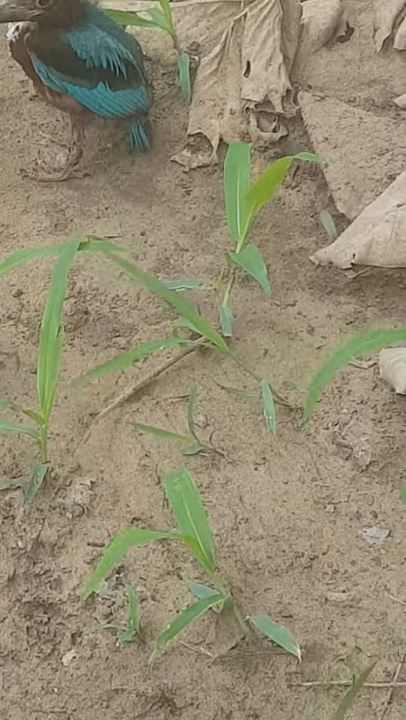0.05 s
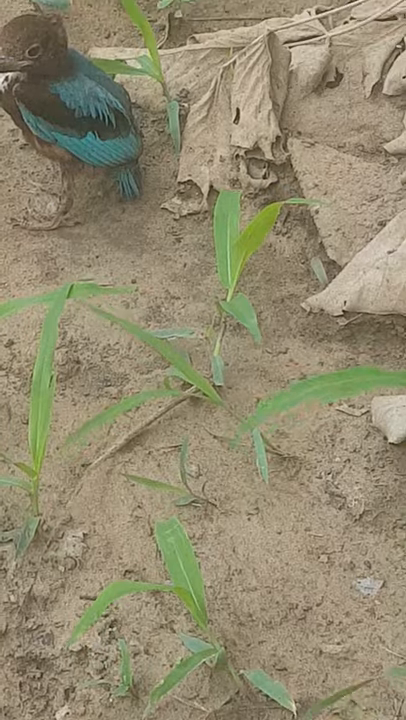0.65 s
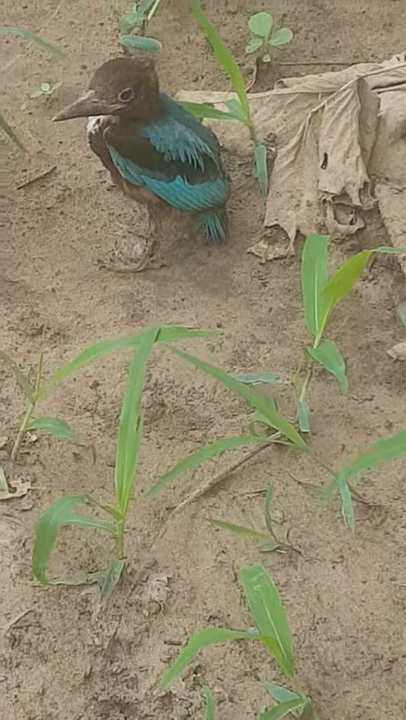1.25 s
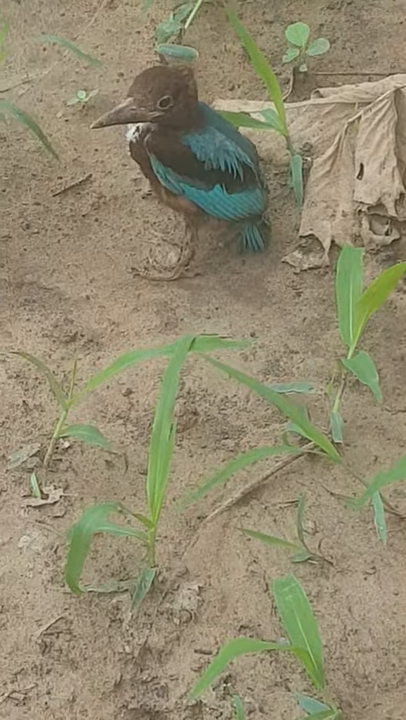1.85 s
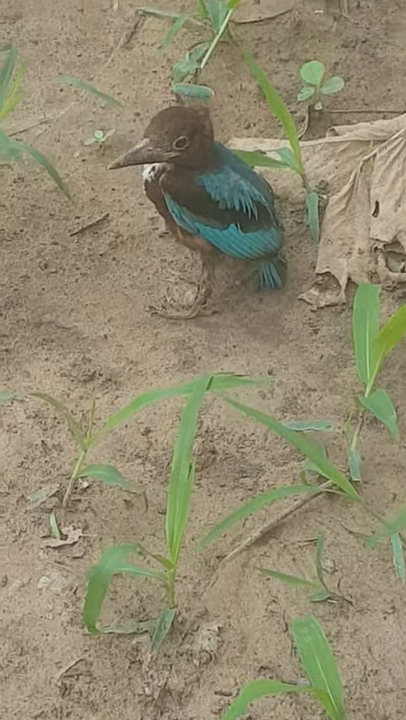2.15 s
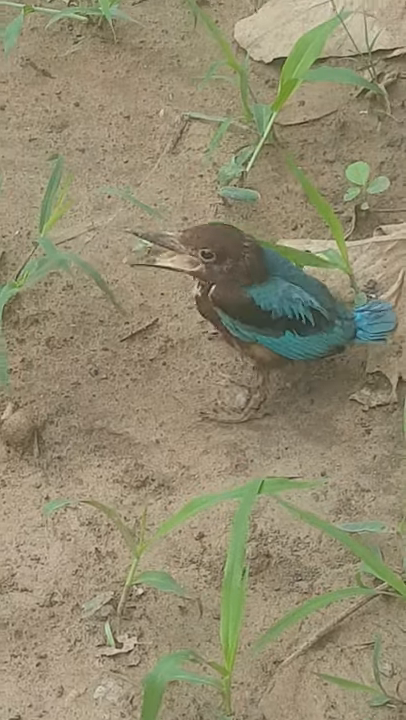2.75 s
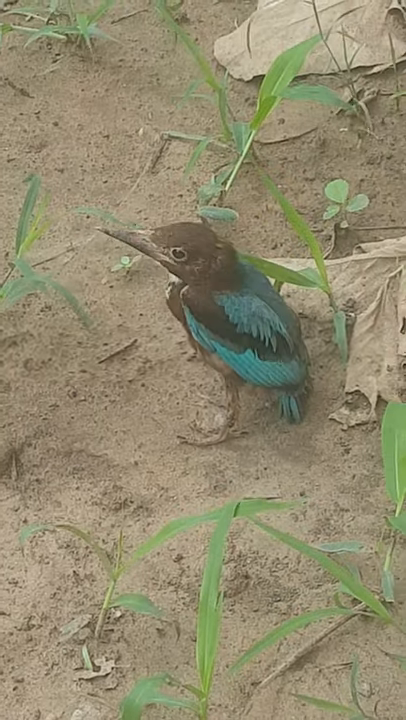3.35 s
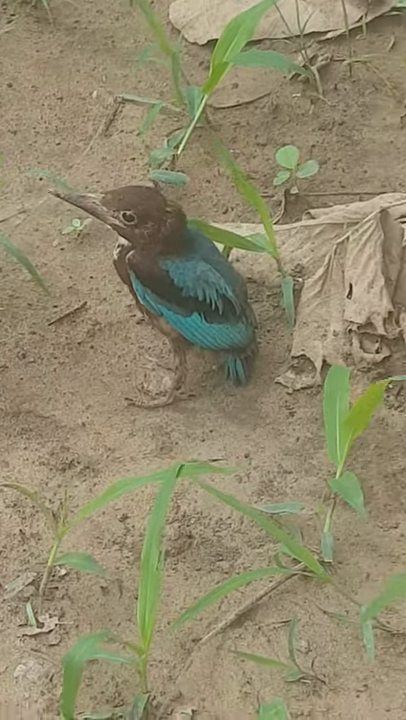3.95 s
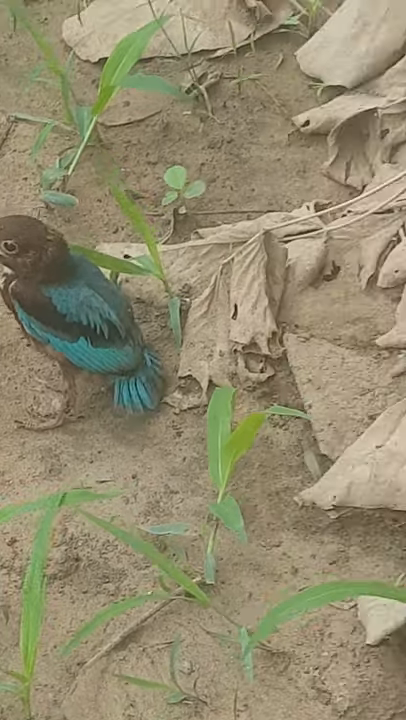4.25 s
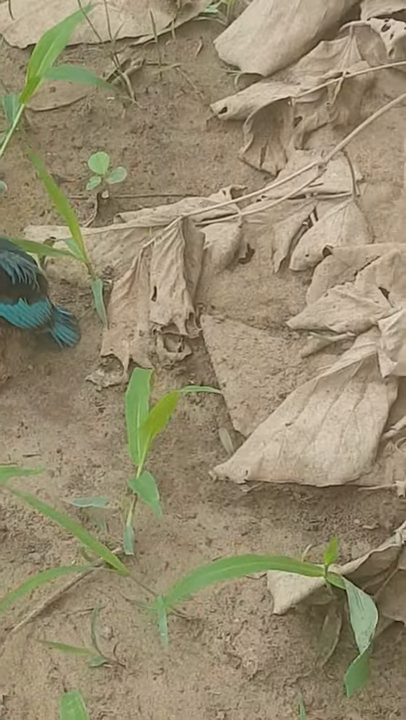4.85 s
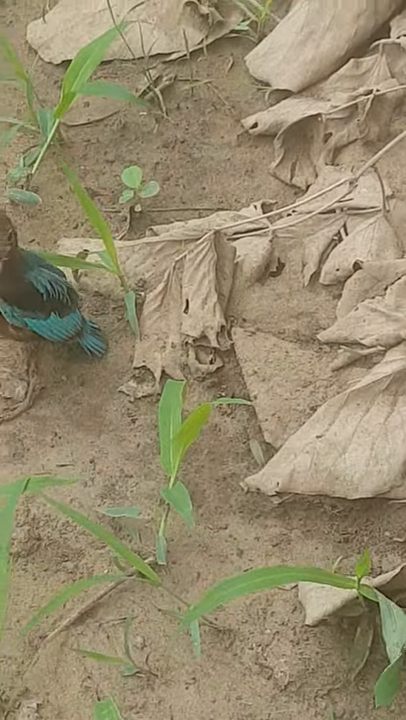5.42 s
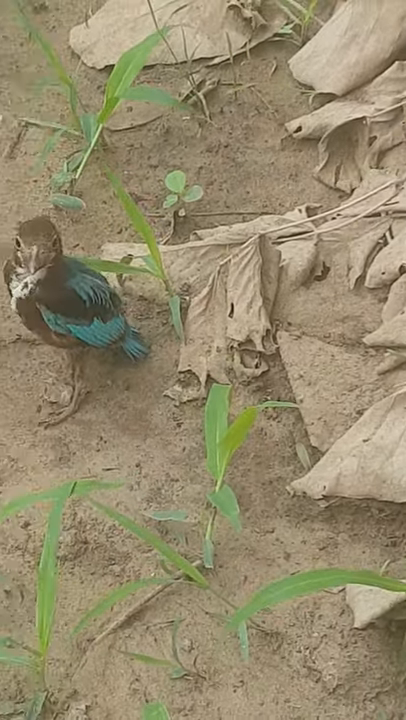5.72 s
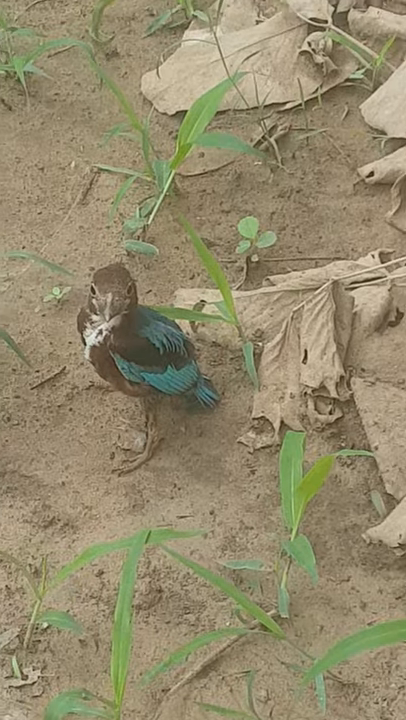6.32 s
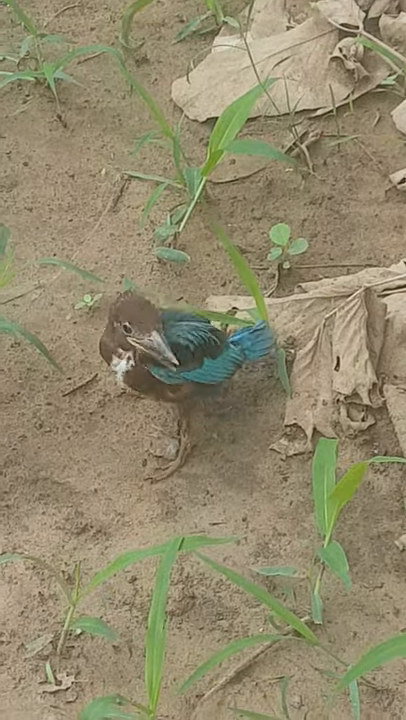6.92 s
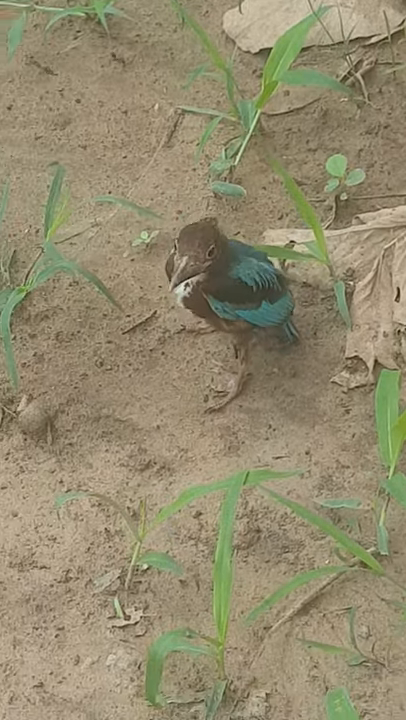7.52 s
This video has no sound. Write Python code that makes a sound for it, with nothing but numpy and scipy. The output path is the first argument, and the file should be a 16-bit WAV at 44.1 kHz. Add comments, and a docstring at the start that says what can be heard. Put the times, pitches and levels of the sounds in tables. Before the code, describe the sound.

A young kingfisher gives two short, sharp chips close by, over a faint insect chirr, light breeze and distant birds.

```python
"""An open field hums with insects throughout; at first a breeze rumbles on the microphone.
Far birds whistle now and then. A few dull taps fall around the moment, near 2.9 s, when a young
kingfisher close by on bare ground gives a sharp chip: a tiny falling whistle with a harsh end.
Near 4 s, with the breeze gone, a soft hiss passes and a far bird runs down a falling trill.
The kingfisher chips once more at 7.1 s."""
import sys
import numpy as np
from scipy import signal
from scipy.fft import rfft, irfft
from scipy.io import wavfile

SR = 44100
rng = np.random.default_rng(int(sys.argv[2]) if len(sys.argv) > 2 else 0)


def output_pcm(signal):
    """Save a mono or channel-first signal as 16-bit PCM at the path in sys.argv[1].

    Samples are clipped to [-1, 1] before scaling.
    """
    pcm = np.clip(np.atleast_2d(signal).T, -1, 1) * 32767
    wavfile.write(sys.argv[1], SR, np.round(pcm).astype(np.int16))


N = 338688
TIME = np.arange(N) / SR


def amp(db):
    """Turns decibels into a number to multiply by."""
    return 10 ** (np.asarray(db) / 20)


def unit(x):
    """Scales a sound to an average strength (rms) of one."""
    return x / np.sqrt(np.mean(x ** 2) + 1e-20)


def at_hz(points, hz):
    """Looks up a table by frequency, with every octave equally wide."""
    f, value = np.transpose(points)
    return np.interp(np.log(hz + 1), np.log(f + 1), value)


def add(mix, s, sound):
    """Mixes a sound in at second s."""
    part = mix[..., max(round(s * SR), 0):][..., :sound.shape[-1]]
    part += sound[..., :part.shape[-1]]


def colour(x, points):
    """Turns a sound's lows and highs up or down by a table of f/Hz, level/dB."""
    return irfft(rfft(x) * amp(at_hz(points, np.fft.rfftfreq(x.shape[-1], 1 / SR))), x.shape[-1])


def noise(points):
    """Unrelated left and right noise of one colour."""
    return unit(colour(rng.standard_normal((2, N)), points))


def waver(size, rate_hz):
    """A random wobble, mostly slower than the given rate."""
    smoothing = signal.butter(2, rate_hz, fs=SR, output="sos")
    return unit(signal.sosfilt(smoothing, rng.standard_normal(size + 2000))[2000:])


def pan(balance_db):
    """Left and right gains: above 0 dB leans left, below 0 dB leans right."""
    return amp(np.array([[balance_db], [-balance_db]]) / 2)


def scatter(x, t60, delay, treble_db=0):
    """Echoes off ground and leaves, different in each ear; they fade by 60 dB in t60 seconds."""
    t = np.arange(SR) / SR
    echoes = rng.choice([-1., 1.], (2, SR)) * (rng.random((2, SR)) < 4000 / SR)
    echoes = colour(echoes * (t > delay) * amp(-60 * t / t60), [(5000, 0), (14000, treble_db)])
    echoes /= np.linalg.norm(echoes, axis=1, keepdims=True) + 1e-20
    return signal.fftconvolve(x[None], echoes, axes=1)[:, :N]


def field_air():
    """The steady wash of open country; its low notes are much alike in both ears."""
    # colour of the wash: f/Hz, level/dB
    air_colour = [(20, -31.5), (32, -18), (50, -12.5), (86, -12.5), (200, -17.5), (420, -14), (1170, -17),
                  (2490, -18), (3500, -26), (4620, -27.5), (7000, -26), (8800, -36), (10400, -34.5),
                  (15500, -34)]
    # its slow drift in loudness: t/s, level/dB
    drift = [(0.0, -62), (0.34, -64.5), (1.08, -63), (1.35, -66), (5.9, -67.5), (7.6, -66.5)]
    # which way it leans: f/Hz, left minus right/dB
    balance = [(60, -3.5), (150, -2.5), (350, -4), (700, -5), (1400, -8), (3000, -7.5), (6000, -7),
               (9000, 1), (14000, 0.5)]
    # how alike the ears are: f/Hz, likeness (0 unrelated, 1 the same)
    likeness = [(60, 0.76), (300, 0.59), (700, 0.392), (1400, 0), (3000, 0.013), (15000, 0)]
    hz = np.fft.rfftfreq(N, 1 / SR)
    left, other = rfft(rng.standard_normal((2, N)))
    same = at_hz(likeness, hz)
    right = same * left + np.sqrt(1 - same ** 2) * other
    lean = amp(np.outer([.5, -.5], at_hz(balance, hz)))
    air = unit(colour(irfft(np.array([left, right]) * lean, N), air_colour))
    return amp(5.5 + np.interp(TIME, *np.transpose(drift))) * air


def breeze(calm_db=-83):
    """Wind on the microphone: gusts of lumpy rumble that die down to a near calm."""
    # gusts: peak t/s, length/s, level/dB
    gusts = [(0.089, 0.176, -53), (0.581, 0.214, -54.5), (0.854, 0.188, -55), (1.172, 0.275, -54),
             (1.605, 0.39, -65.5), (1.883, 0.057, -58.5), (2.508, 0.237, -64), (2.843, 0.38, -66),
             (3.346, 0.58, -71.5)]
    # colour of the rumble: f/Hz, level/dB
    rumble_colour = [(15, -17), (28, -1.5), (45, -9.5), (75, 4.5), (125, 0), (180, -2.5), (350, -10),
                     (650, -33.5), (1200, -23.5), (2500, -90.5)]
    lumps = noise([(1, -6.5), (14, 11), (50, -54.5), (200, -100)])
    rumble = unit(noise(rumble_colour) * amp(2.64 * lumps))
    power = sum(amp(db) ** 2 * 4 ** -((2 * (TIME - s) / length) ** 2) for s, length, db in gusts)
    return np.sqrt(power + amp(calm_db) ** 2) * rumble * pan(4.5)


def hisses():
    """Short, soft, high hisses that start quickly and die away."""
    # hisses: t/s, length/s, level/dB
    hiss_list = [(0.793, 0.055, -69.5), (4.019, 0.377, -66)]
    # their colour: f/Hz, level/dB
    hiss_colour = [(3000, -18), (5000, 1.5), (7200, 8), (8800, -11.5), (11000, -11.5), (15000, -6)]
    swell = np.zeros(N)
    for s, length, db in hiss_list:
        u = np.linspace(0, 1, int(length * SR))
        add(swell, s, amp(db) * np.interp(u, [0, .12, .54, 1], [0, 1, 1, 0]))
    return swell * noise(hiss_colour) * pan(-12.5)


def wing_blur(hz, width_hz):
    """Many insect wing strokes blur into a narrow hiss around the pitch at which the wings ring."""
    f = np.fft.rfftfreq(N, 1 / SR)
    return unit(irfft(rfft(rng.standard_normal((2, N))) / (1 + ((f - hz) / width_hz) ** 4), N))


def insect_chorus(period_s=.302, crest_s=.22, swing_db=2):
    """A thin, high chorus of insects swells and ebbs at a steady pace."""
    swell = np.cos(2 * np.pi * (TIME - crest_s) / period_s)
    return amp(-78.5 + swing_db * swell) * wing_blur(6895, 470)


def cricket(throb_s=.0692, throbs_per_s=10.3, throb_db=-74, buzz_db=-78.5):
    """A bush cricket's wings throb evenly over a held buzz; a trace of echo fills the pauses."""
    # spells of song: first throb t/s, last throb t/s
    bouts = [(.005, .389), (.67, 3.215), (3.451, 4.21), (4.665, 5.52), (5.96, 7.62)]
    strength = np.zeros(N)
    throb = signal.windows.tukey(int(throb_s * SR), .9)
    for first, last in bouts:
        buzz = signal.windows.tukey(int((last - first + 1.18 * throb_s) * SR), .1)
        add(strength, first - throb_s * .52, amp(buzz_db) * buzz)
        for s in np.linspace(first, last, round((last - first) * throbs_per_s) + 1):
            add(strength, s - throb_s / 2, amp(throb_db + rng.normal(0, .37)) * throb)
    song = strength * wing_blur(5427, 276)
    return song + amp(-5) * scatter(song[1], t60=2.2, delay=.02)


def ticking_insect(tick_s=.01063, ticks_per_s=86, run_s=.072, run_step_s=.115, run_fade_db=-1.5):
    """An insect gives two or three short runs of ticks each second; every tick slides down in pitch."""
    # phrases: t/s, level/dB, number of runs
    phrases = [(-.028, -63.5, 3), (0.958, -63, 2), (1.961, -64.5, 3), (2.972, -65.5, 3), (3.914, -63.5, 2),
               (4.907, -66, 3), (5.925, -65.5, 3), (6.916, -68, 2)]
    ticks = np.zeros(N)
    slide_hz = np.linspace(6200, 5300, int(tick_s * SR))
    for s, db, runs in phrases:
        for run in range(round(runs)):
            starts = s + run * run_step_s + np.arange(0, run_s, 1 / ticks_per_s)
            for start in starts[starts >= 0]:
                hz = slide_hz * rng.normal(1, .0119)
                stroke = signal.windows.tukey(len(hz), .6) * np.sin(2 * np.pi * np.cumsum(hz) / SR)
                add(ticks, start, amp(db + run * run_fade_db + rng.normal(0, 1)) * stroke)
    return ticks + amp(-4) * scatter(ticks, t60=.62, delay=.005)


def far_whistles(best_hz=3300, loss_db_per_octave=16, fade_db_per_s=-28):
    """Far birds whistle single slides, hoarser the more they slide and smeared by the trees."""
    # whistles: t/s, length/s, level/dB, start f/Hz, end f/Hz, bend (above 0 slides early, below 0 late)
    slides = [(.178, 0.058, -61, 3450, 2720, 0.7), (.45, 0.1016, -57, 3116, 3990, 7.5),
              (.574, .124, -53, 5516, 2651, 3), (1.09, .074, -53, 3123, 5677, -3),
              (2.595, .255, -60.5, 2960, 2711, -1.5), (3.76, 0.056, -66.5, 3350, 4630, 1.03),
              (5.61, 0.0416, -65, 3462, 5030, 0.16)]
    song = np.zeros(N)
    for s, length, db, start_hz, end_hz, bend in slides:
        u = np.linspace(0, 1, int(length * SR))
        hz = start_hz + (end_hz - start_hz) * np.expm1(-bend * u) / np.expm1(-bend)
        rough = .0236 + .0802 * np.minimum(abs(np.gradient(np.log(hz), u)), .6)
        phase = 2 * np.pi * np.cumsum(hz * (1 + rough * waver(len(u), 272.6))) / SR
        strain_db = loss_db_per_octave * abs(np.log2(hz / best_hz))  # weaker away from its best pitch
        strength = amp(db - strain_db + fade_db_per_s * length * u) * signal.windows.tukey(len(u), .35)
        add(song, s, strength * np.sin(phase))
    return amp(-1.5) * song + scatter(amp(3.5) * song, t60=.807, delay=.0059)


def far_trill(start_s=4.068, step_s=.0903, note_s=.049, top_hz=3423.4, sink_hz=249.5, slur_hz=351.3):
    """A far bird's nine notes swell, then tire: each starts lower and slurs further down than the last."""
    song, u = np.zeros(N), np.linspace(0, 1, int(note_s * SR))
    for k, tired in enumerate(np.linspace(0, 1, 9)):
        since = k * step_s
        strength = amp(-51.5 - 14 * np.exp(-since / .163)) * signal.windows.tukey(len(u), .8)
        sag_hz = slur_hz * tired ** 1.956 * (u + .165 * waver(len(u), 300))  # longer falls are rougher
        phase = 2 * np.pi * np.cumsum(top_hz - sink_hz * tired ** 3.58 - sag_hz) / SR
        note = strength * (np.sin(phase) + tired * amp(-18) * np.sin(2 * phase))
        add(song, start_s + since, note)
        add(song, start_s + since + .029, amp(-6) * note)  # one strong echo beats against the note
    return song + amp(-4.5) * scatter(song, t60=.71, delay=.0099)


def taps(sag_s=.00161, low_hz=130):
    """Dull taps and faint bumps: each is a tick plus a knock that ends in the bass and dies at once."""
    # taps: t/s, level/dB, start f/Hz, decay/s, tick compared with knock/dB
    tap_list = [(0.437, -47.5, 550, 0.00183, -19.5), (2.6216, -44.5, 1053, 0.00135, 0),
                (2.98, -37.5, 1420, 0.0007, -3), (3.2139, -41.5, 890, 0.00101, -1),
                (3.7, -55.5, 350, 0.00188, -22), (4.595, -58, 110, 0.00386, -25)]
    # colour of the tick: f/Hz, level/dB
    tick_colour = [(200, -2), (1200, 10.5), (2500, 0.5), (4500, -2.5), (7500, -13.5), (10000, -32),
                   (15000, -29)]
    out, t = np.zeros(N), np.arange(SR // 20) / SR
    for s, db, hz, decay, tick_db in tap_list:
        grit = unit(colour(rng.standard_normal(len(t)), tick_colour))
        tick = amp(tick_db) * grit * np.exp(-t / .00105)
        phase = 2 * np.pi * np.cumsum(low_hz + (hz - low_hz) * np.exp(-t / sag_s)) / SR
        knock = np.sin(phase) * t / decay * np.exp(1 - t / decay)
        add(out, s, amp(db) * (knock + tick))
    return (out + amp(-7) * scatter(out, t60=.034, delay=.0024)) * pan(-4.5)


def kingfisher(rasp_rise_s=.0114, rasp_fall_s=.0058, squeak_s=.012, squeak_lead_s=.032):
    """A faint squeak leads into each chip, a few milliseconds of falling whistle that ends harshly."""
    # chips: t/s, length/s, level/dB, start f/Hz, target f/Hz, 2nd harmonic/dB, 3rd harmonic/dB,
    # rasp/dB, treble lost because the bill is turned/dB
    chips = [(2.8567, 0.0081, -17, 5542, 4292, -19.5, -30.5, -20.5, 2.5),
             (7.1082, 0.00902, -15.5, 5958, 4268, -17.5, -16.5, -20.5, -4)]
    # colour of the rasp: f/Hz, level/dB
    rasp_colour = [(1500, -22), (3000, -17), (3900, -6), (5000, 7), (7300, 6.5), (9500, -1), (11500, -12.5),
                   (13500, 5), (16000, -24)]
    # colour of the voice sideways, without the bill's forward ring: f/Hz, level/dB
    sideways = [(3000, 15), (4000, 8), (4600, -5), (5300, 4), (6700, -1), (9000, 1), (13500, -5.5),
                (16000, -2)]
    direct, spread = np.zeros((2, N)), np.zeros(N)
    for s, length, db, start_hz, target_hz, second_db, third_db, rasp_db, turned_db in chips:
        u = np.arange(int(length * SR)) / (length * SR)
        hz = target_hz + (start_hz - target_hz) * np.exp(-u / .308)
        hz *= 1 + .0133 * waver(len(u), 1260)
        phase = 2 * np.pi * np.cumsum(hz) / SR + np.array([[1.], [0]])  # reaches the left a little early
        breath = amp(db) * signal.windows.tukey(len(u), .467)
        tone = breath * amp(-1 - 11.1 * abs(u - .4)) * np.sin(phase)
        overtones = amp(second_db) * np.sin(2 * phase) + amp(third_db) * np.sin(3 * phase)
        overtones *= breath * amp(6.7 * (u - 1.5))
        # the rasp swells through the chip and peaks as the whistle breaks off
        after = TIME - s - length
        below_peak_db = 20 * np.maximum(after / rasp_fall_s, -after / rasp_rise_s)
        rasp = amp(db + rasp_db - below_peak_db) * noise(rasp_colour)
        # the bill beams the treble forward; the surroundings get all of it, whichever way it points
        add(direct, s, tone * pan(-6.5) + amp(-turned_db) * overtones * pan(9.9))
        direct += amp(-turned_db) * rasp
        add(spread, s, tone[1] + amp(6.5) * overtones[1])
        spread += amp(9.5) * rasp[1]
        # the voice starts up with a rough, rising squeak
        size = int(squeak_s * SR)
        rise_hz = np.linspace(4100, 5400, size) * (1 + .037 * waver(size, 900))
        squeak = np.sin(2 * np.pi * np.cumsum(rise_hz) / SR) + .39 * noise(rasp_colour)[0, :size]
        squeak *= amp(db - 42) * signal.windows.tukey(size, .7)
        add(direct, s - squeak_lead_s, squeak * pan(-9))
        add(spread, s - squeak_lead_s, amp(13.5) * squeak)
    spread = colour(spread, sideways)
    near_echo = amp(-14) * scatter(spread, t60=.107, delay=.0077, treble_db=2) * pan(-1.5)
    far_echo = amp(-25) * scatter(spread, t60=.494, delay=.023, treble_db=-6) * pan(-9.5)
    return direct + near_echo + far_echo


def scene():
    """The near bird over the sounds of the field, with far birds and insects off to the right."""
    near_bird = kingfisher()
    far_birds = (far_whistles() + far_trill()) * pan(-7.5)
    insects = (cricket() + ticking_insect() + insect_chorus()) * pan(-10)
    return near_bird + far_birds + insects + taps() + hisses() + field_air() + breeze()


def record(dry, top_hz=15900, offset=-.0005):
    """The recorder cuts the highest treble, and its converter shifts the wave slightly off zero."""
    treble_cut = signal.firwin(255, top_hz, window=("kaiser", 9), fs=SR)
    return signal.oaconvolve(dry, treble_cut[None], "same") + offset


dry = scene()
out = record(dry)
output_pcm(out)
```